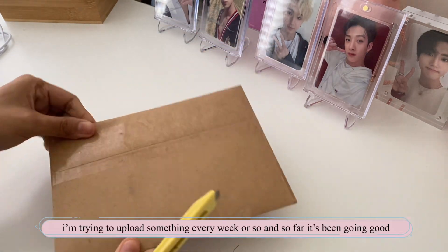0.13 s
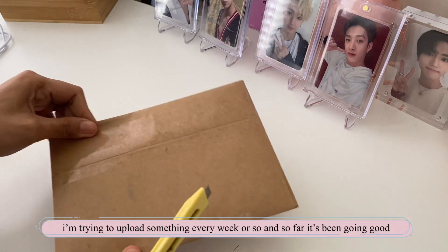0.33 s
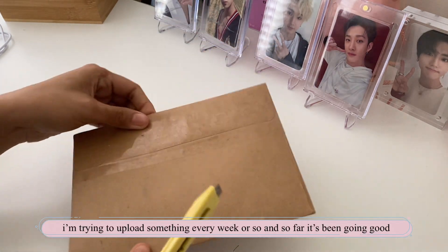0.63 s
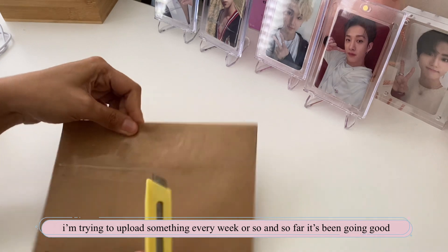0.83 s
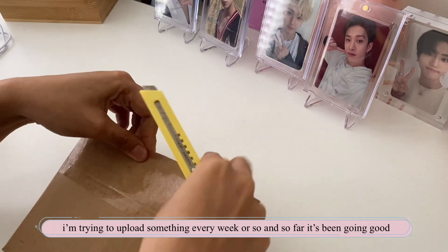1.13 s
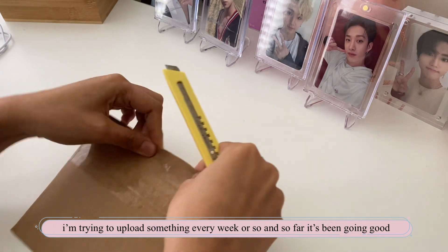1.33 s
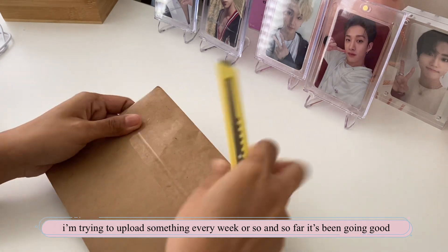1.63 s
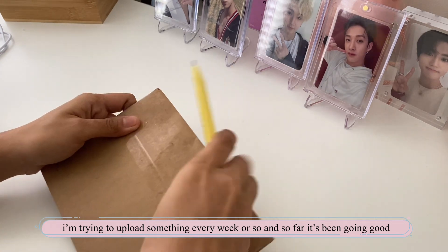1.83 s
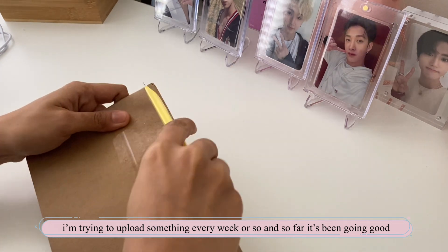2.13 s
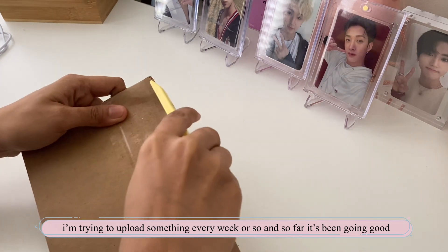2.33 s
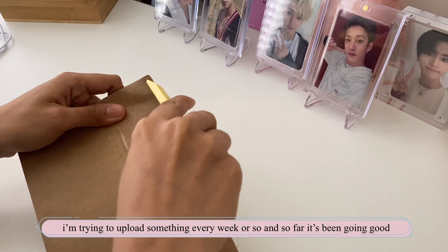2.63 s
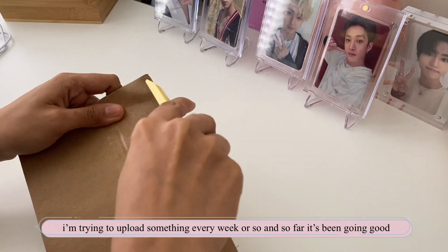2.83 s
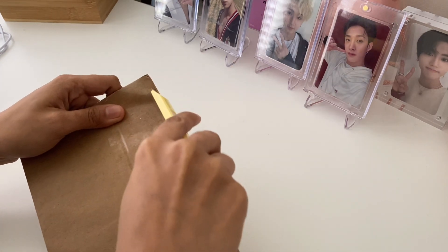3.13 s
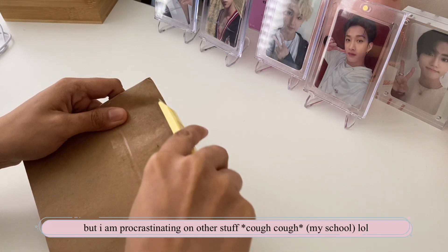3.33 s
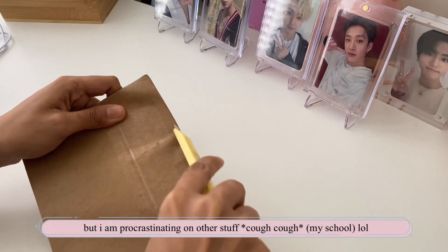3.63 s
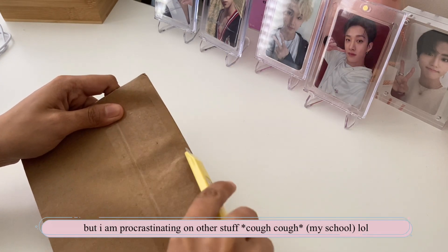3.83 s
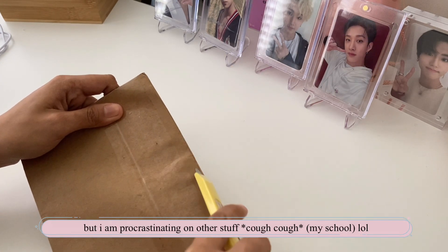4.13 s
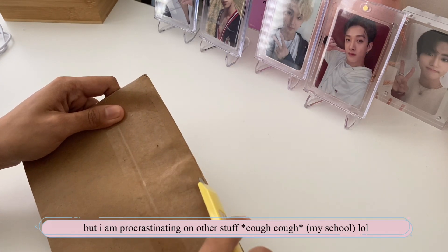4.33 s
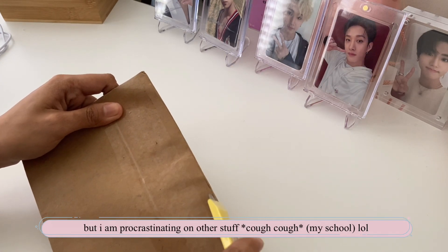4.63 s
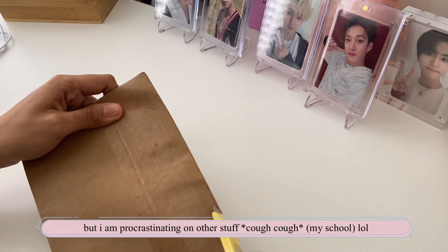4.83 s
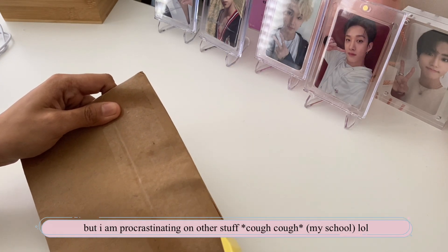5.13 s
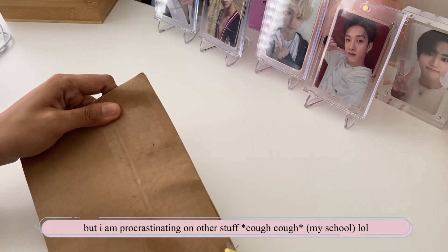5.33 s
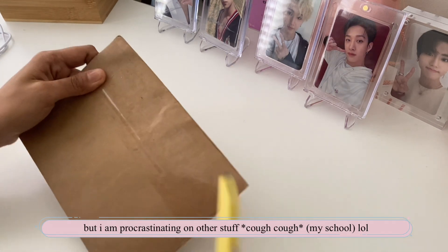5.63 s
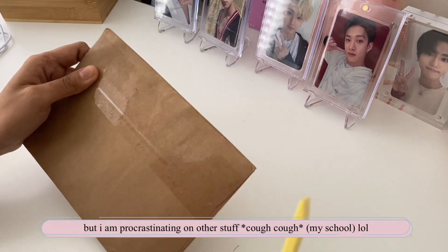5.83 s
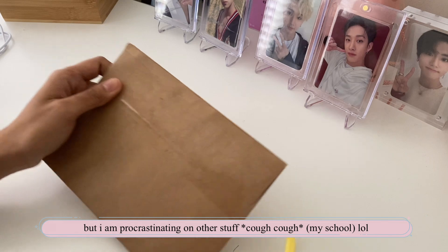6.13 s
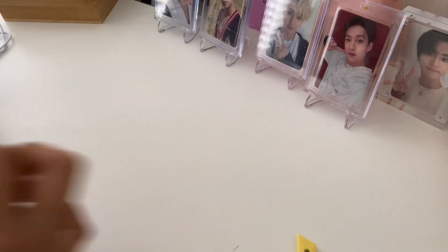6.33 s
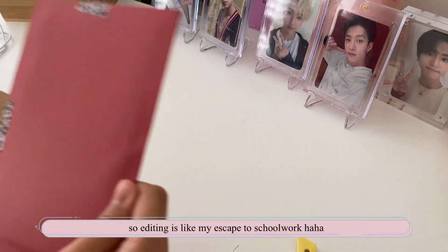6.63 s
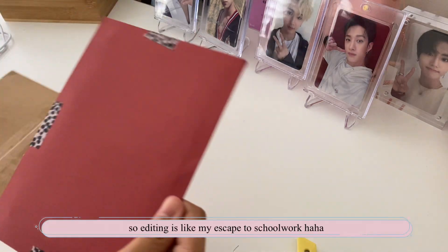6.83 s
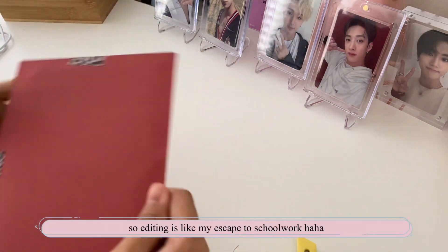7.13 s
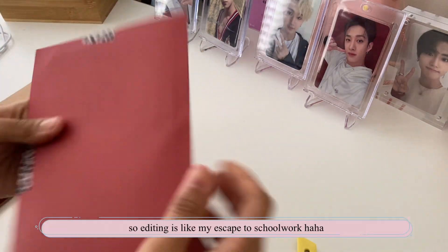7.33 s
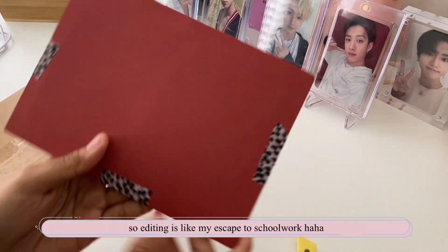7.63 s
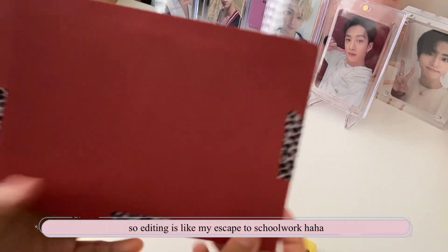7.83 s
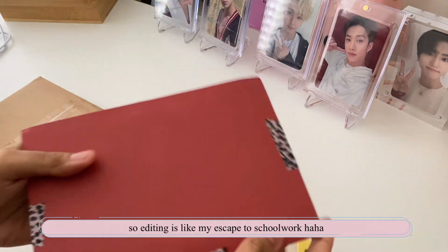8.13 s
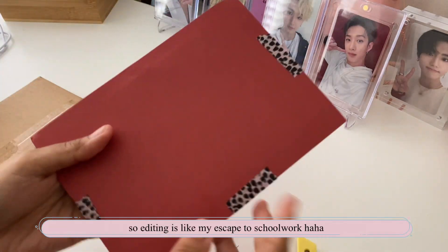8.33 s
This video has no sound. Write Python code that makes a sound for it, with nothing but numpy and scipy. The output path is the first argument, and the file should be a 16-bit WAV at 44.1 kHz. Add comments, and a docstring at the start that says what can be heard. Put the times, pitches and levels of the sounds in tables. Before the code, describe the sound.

Close stereo microphone at a desk in a small room, leaning left. A paper mailer is softly shuffled and knocks once on the desktop. A utility knife then tears the fold in short, scratchy pushes full of crisp snaps. The slider ticks rapidly as the blade retracts, a stiff card whisks out in one quick scrape, and light papery handling follows over low rumble and a faint distant motor.

```python
"""A utility knife slits a paper mailer in short pushes: dense random fibre snaps, filtered by paper resonances.
Before that the mailer is turned over and bumped on a desk: soft slides of noise grains, knocks and desk modes.
Afterwards the slider ticks, a card is whisked out in one quick scrape, and it is turned in the hands.
A small room answers with filtered noise; beneath lie a low rumble, a faint hiss and a distant motor's drone.
A close stereo microphone hears it, leaning left through most of its range."""
import sys
import numpy as np
from scipy import signal
from scipy.fft import rfft, irfft, next_fast_len
from scipy.io import wavfile
from scipy.ndimage import uniform_filter1d

SR = 44100
rng = np.random.default_rng(int(sys.argv[2]) if len(sys.argv) > 2 else 0)


def master_out(mix):
    """Clip the mix to full scale and print it as 16-bit PCM to the path in sys.argv[1]."""
    frames = np.transpose(np.atleast_2d(mix))
    ceiling = np.clip(frames, -1, 1)
    pcm = np.round(ceiling * 32767).astype(np.int16)
    wavfile.write(sys.argv[1], SR, pcm)


N = 373659
TIME = np.arange(N) / SR  # seconds


def amp(db):
    """Decibels to gain."""
    return 10 ** (np.asarray(db) / 20)


def evened(x):
    """Scales to rms 1."""
    return x / np.sqrt(np.mean(x ** 2) + 1e-20)


def read(points, hz):
    """Reads a table on a log-frequency axis."""
    f, value = np.transpose(points)
    return np.interp(np.log(hz + 1), np.log(f + 1), value)


def follow(points):
    """Reads a table of (seconds, value) along the whole scene."""
    return np.interp(TIME, *np.transpose(points))


def add(mix, s, sound):
    """Mixes a sound in at time s."""
    part = mix[..., max(round(s * SR), 0):][..., :sound.shape[-1]]
    part += sound[..., :part.shape[-1]]


def band(x, edges_hz, kind, order=2):
    """Causal low-, high- or band-pass."""
    edges_hz = np.clip(edges_hz, 10, .49 * SR)
    return signal.sosfilt(signal.butter(order, edges_hz, kind, fs=SR, output="sos"), x)


def colour(x, points, size=8192):
    """Causal, minimum-phase filter with the given spectrum."""
    log_gain = np.log(amp(read(points, abs(np.fft.fftfreq(size, 1 / SR)))))
    response = np.exp(np.conj(signal.hilbert(log_gain)))
    impulse = np.fft.ifft(response).real[:size // 2]
    return signal.oaconvolve(x, impulse)[:len(x)]


def resonate(x, hz, width_hz):
    """One resonance of gain 1 at its peak."""
    return signal.lfilter(*signal.iirpeak(min(hz, .45 * SR), hz / min(width_hz, .3 * SR), SR), x)


def ring(x, modes):
    """A sound together with the resonances that it excites."""
    return x + sum(amp(db) * resonate(x, hz, width) for hz, width, db in modes)


def glide(x, pitches, width_hz):
    """A resonance that follows a pitch curve: shift the pitch down to zero, low-pass, shift back."""
    turn = np.exp(2j * np.pi * np.cumsum(follow(pitches)) / SR)
    r = np.exp(-np.pi * width_hz / SR)
    return 2 * (turn * signal.lfilter([1 - r], [1, -r], x / turn)).real


def burst(db, modes, decay_s, tail, apart):
    """A sudden crackle of a few milliseconds into a set of resonances, left and right."""
    t = np.arange(SR // 20) / SR
    shared, own = rng.standard_normal((2, len(t)))
    onset = 1 - np.exp(-t / .001)
    shape = onset * (np.exp(-t / decay_s) + tail * np.exp(-t / .007))
    pair = ring(shape * (shared + np.array([[1], [-1]]) * apart * own), modes)
    return amp(db) * pair / np.linalg.norm(pair[0])  # db sets the energy of the left side


def fibres(per_s, spread_db, tugs_per_s, tug_size, tug_s):
    """Tiny fractures of random size; they surge each time the paper catches and lets go, then die away."""
    kicks = (rng.random(N) < tugs_per_s / SR) * rng.uniform(0, 1.29, N)
    t = np.arange(SR // 10) / SR
    tug = t / tug_s * np.exp(1 - t / tug_s)
    surge = 1 + tug_size * signal.oaconvolve(kicks, tug)[:N]
    surge /= uniform_filter1d(surge, SR // 20)  # the hand keeps the mean force steady
    sizes = amp(spread_db * np.minimum(rng.exponential(1, N), 4)) * surge
    snapped = rng.random(N) < per_s / SR
    return evened(sizes * rng.choice([-1, 1], N) * snapped)


def stroke(start_s, length_s, rise_s, release_s):
    """Pressure builds over the rise (at once if it is negative) and dies away after the stroke's length."""
    t = TIME - start_s
    build = np.clip(t / max(rise_s, 1 / SR), 0, 1)
    return build * np.exp(-np.clip((t - length_s) / release_s, 0, 20))


def friction(strokes, releases_s, grains):
    """Grains sorted by pitch into flutter, rasp and fizz; the strokes set the force of each."""
    flutter = evened(band(grains, 870, "low", order=3))
    rasp = evened(band(grains, [1300, 8800], "band", order=3))
    fizz = evened(band(grains, [8800, 18000], "band", order=3))
    start, length, rise, force_db, flutter_db, fizz_db = np.transpose(strokes)
    pressure = np.array([stroke(*timing) for timing in zip(start, length, rise, releases_s)])
    gains = amp([force_db, force_db + flutter_db, force_db + fizz_db])
    mid, low, high = np.sqrt(gains ** 2 @ pressure ** 2)  # overlapping strokes add as power
    return mid * rasp + low * flutter + high * fizz


def flex(x, depth_db, size=512):
    """The bending sheet radiates in shallow, shifting lobes, a little differently to each side."""
    z = signal.stft(x, SR, nperseg=size, noverlap=size * 3 // 4)[2]
    lobes = rng.standard_normal((3,) + z.shape)
    for _ in range(2):  # smooth over pitch, then over time
        lobes = uniform_filter1d(uniform_filter1d(lobes, size=3, axis=1), size=40, axis=2)
    shared, lean, lag = evened(lobes)
    side = np.array([1, -1])[:, None, None]
    z = z * amp(depth_db * (shared + .7 * side * lean)) * np.exp(.5j * side * lag)
    y = signal.istft(z, SR, nperseg=size, noverlap=size * 3 // 4)[1][:, :N]
    return evened(y) * np.std(x)


def background():
    """Low rumble of room and desk, nearly alike on both sides, with a motor's wavering drone and faint hiss."""
    # Rumble level. Each row: time in seconds, level in dB.
    rumble_level = [(0, -60.5), (1.6, -63.5), (2.7, -65), (3.9, -60.5), (4.25, -70.5), (4.7, -71),
                    (5.2, -55), (6.15, -64), (6.6, -55), (7.6, -56), (8.0, -50.5), (8.47, -53)]
    # Rumble spectrum. Each row: frequency in Hz, gain in dB.
    rumble_colour = [(15, -17.5), (35, -3.5), (48, 2.5), (61, 1.5), (72, 3.5), (100, -5), (120, -2.5),
                     (155, -8), (205, -4.5), (260, -18.5), (400, -22), (700, -54.5), (1500, -50.5),
                     (4000, -76.5)]
    # Pitch of a faint motor beyond the room that idles, then revs twice. Each row: time in seconds, pitch in Hz.
    drone_pitch = [(7.22, 186), (7.3, 216), (7.55, 196), (7.8, 193), (8.2, 209)]
    # Hiss spectrum. Each row: frequency in Hz, gain in dB.
    hiss_colour = [(30, -4), (300, 1.5), (600, -2.5), (1200, -13.5), (3000, -16), (8000, -16.5),
                   (16000, -20)]
    drone_start_s, drone_rise_s, drone_db, hiss_db = 6.25, 0.55, -60, -79

    shared, apart = (evened(colour(rng.standard_normal(N), rumble_colour)) for _ in range(2))
    rumble = amp(follow(rumble_level)) * (shared + np.array([[.13], [-.13]]) * apart)

    waver = 1 + 0.63 * evened(band(rng.standard_normal(N), 9.1, "low"))
    swell = amp(drone_db) * np.clip((TIME - drone_start_s) / drone_rise_s, 0, 1)
    drone = swell * waver * np.sin(2 * np.pi * np.cumsum(follow(drone_pitch)) / SR)

    both, left, right = (evened(colour(rng.standard_normal(N), hiss_colour)) for _ in range(3))
    hiss = amp(hiss_db) * evened(both + np.array([left, right]))
    return rumble + drone + hiss


def room(x, size=256):
    """Diffuse reflections from the walls: noise that fades in softly and dies at its own rate in each band."""
    # Reverberation. Each row: frequency in Hz, time to fall by 60 dB in seconds.
    room_t60 = [(100, 0.87), (500, 0.24), (2000, 0.57), (6000, 0.12), (16000, 0.16)]
    hz, t, z = signal.stft(rng.standard_normal((2, SR // 2)), SR, nperseg=size)
    decay = amp(-60 * t / read(room_t60, hz)[:, None])
    tail = signal.istft(z * decay, SR, nperseg=size)[1]
    tail *= np.clip(np.arange(tail.shape[1]) / SR / 0.0088, 0, 1) ** 2
    return signal.fftconvolve(x, tail / np.linalg.norm(tail[0]), axes=1)[:, :N]


def desk():
    """The desk top booms under the heavier blows: a sum of decaying sine modes."""
    # Blows that reach the desk top. Each row: time in seconds, relative level in dB.
    thumps = [(.787, -22.5), (0.805, -27), (1.6, -45), (6.268, -37), (6.371, -44), (6.631, -44),
              (7.924, -41.5), (8.166, -40.5)]
    # Modes of the desk top. Each row: pitch in Hz, relative level in dB, time to fall by 60 dB in seconds.
    desk_modes = [(62.1, -5, 0.2), (88, -3, 0.2), (122, -9.5, .42), (185.1, -11, 0.4), (267.6, -9, 0.1),
                  (340, -6.5, 0.11), (547, -14, 0.051)]
    out, t = np.zeros(N), np.arange(SR) / SR
    boom = sum(amp(level - 60 * t / t60) * np.sin(2 * np.pi * hz * t) for hz, level, t60 in desk_modes)
    for s, db in thumps:
        add(out, s, amp(db - 6.5) * boom)
    return band(out, 51, "high")


def taps():
    """A stiff edge is struck: a heavily damped knock and a short papery rattle."""
    # Taps of card, knife and fingers. Each row: time in seconds, relative level in dB,
    # pitch of the struck spot in Hz.
    tap_list = [(0.199, -30.5, 1530), (0.201, -26.5, 2480), (0.296, -50, 1262), (0.784, -12, 840),
                (0.793, -20.5, 401), (0.801, -18.5, 1010), (0.812, -27, 813), (0.82, -25.5, 401),
                (1.16, -32.5, 900), (1.598, -34.5, 1050), (1.626, -34, 789), (1.68, -42, 2497),
                (2.357, -47, 810), (3.937, -21.5, 2000), (4.082, -19, 3380), (6.067, -41, 407),
                (6.367, -25, 680), (6.631, -37, 3660), (6.907, -34.5, 2450), (7.656, -43, 910),
                (7.795, -35, 1880), (8.061, -40.5, 1034), (8.093, -44.5, 813), (8.167, -36, 800)]
    out, t = np.zeros((2, N)), np.arange(SR // 10) / SR
    rattle_decay = 0.063 * np.exp(-t / 0.0045) + 0.027 * np.exp(-t / .012)
    for s, db, hz in tap_list:
        rattle = rng.standard_normal((2, len(t))) * rattle_decay
        strike = band(signal.unit_impulse(len(t)) + rattle, 3 * hz, "low")
        knock = resonate(strike, hz, 0.48 * hz)
        add(out, s + .001, amp(db - 3.5) * (knock / abs(knock).max() + 0.94 * rattle))
    return out


def handling():
    """Paper slides softly over desk and skin; a firmer slide is brighter."""
    # Slides on the desk and under fingers. Each row: start in seconds, length in seconds, rise in seconds,
    # relative force in dB, flutter of the sheet in dB re force.
    slides = [(0, 0.14, 0.0054, -70, 7), (.2, .11, 0.011, -76, 10.5), (0.366, 0.47, 0.024, -65.5, -2.5),
              (.449, 0.073, 0.0059, -56, -13), (0.717, 0.22, 0.077, -50, -6.5),
              (.98, 0.44, 0.017, -67.5, 2.5), (1.249, .18, .14, -54, -9), (1.477, 0.21, 0.084, -59.5, -1.5),
              (1.699, 0.32, .03, -68.5, -21), (5.481, 0.27, 0.012, -60, 1.5), (5.758, .48, .02, -74.5, 4.5),
              (6.34, .07, 0.034, -56, 3), (6.493, .06, 0.006, -63.5, 3.5), (6.574, .08, .03, -56, -1.5),
              (6.658, 0.2, 0.033, -62.5, -12.5), (6.899, 0.025, 0.0065, -61, 3),
              (7.186, .14, .012, -64, -8), (7.414, 0.059, .05, -75, -4), (7.582, 0.12, 0.14, -62, 0),
              (7.731, 0.052, 0.06, -48, -4.5), (7.92, .02, .004, -60, -10.5), (8.028, 0.12, 0.04, -60, -5),
              (8.366, 0.03, 0.011, -64, -1.5)]
    # Resonances of the sheet. Each row: pitch in Hz, width in Hz, level in dB.
    sheet = [(2180, 290, -20), (3750, 2200, -7), (7100, 1200, -11.5)]
    # The swish peaks at a pitch that shifts with the grip. Each row: time in seconds, pitch in Hz.
    gap = [(.45, 2300), (.9, 2350), (1.35, 1800), (1.8, 3120), (2.15, 2665), (6.5, 2460), (6.8, 3550),
           (7.45, 3300), (7.7, 2600), (7.85, 3600), (8.4, 4100)]
    # Spectrum of the slides. Each row: frequency in Hz, gain in dB.
    slide_colour = [(60, -16), (250, -1), (500, -1.5), (1000, -0.5), (1500, 0), (3000, 3.5), (5500, 4.5),
                    (8000, 6.5), (12000, 9), (16000, 6)]
    release_s = 0.037
    fizz_db, fizz_per_db = -7, 0.12  # fizz re force at a force of -60 dB, and its gain for each dB of force

    strokes = [(*row, fizz_db + fizz_per_db * (row[3] + 60)) for row in slides]
    grains = fibres(per_s=9000, spread_db=2.8, tugs_per_s=50, tug_size=.8, tug_s=.0015)
    grains = ring(grains, sheet) + amp(6) * glide(grains, gap, width_hz=1000)
    slide = colour(friction(strokes, [release_s] * len(strokes), grains), slide_colour)
    return amp(-3.5) * flex(slide, depth_db=1.3)


def slider():
    """Small plastic ticks over near-even notches, harder as it goes, as the blade is drawn back in."""
    # Resonances of the slider. Each row: pitch in Hz, width in Hz, level in dB.
    slider_modes = [(2180, 680, 5), (4020, 500, -5), (6300, 920, 4.5)]
    start_s, end_s, notch_count = 5.602, 5.736, 12
    first_db, last_db, spread_db = -33, -21, 1
    out = np.zeros((2, N))
    times = np.linspace(start_s, end_s, notch_count)
    levels = np.linspace(first_db, last_db, notch_count)
    for s, db, (late, harder) in zip(times, levels, rng.standard_normal((notch_count, 2))):
        tick = burst(db + spread_db * harder, slider_modes, decay_s=.0012, tail=.03, apart=.4)
        add(out, s + .001 * late, tick)
    return out


def whisk():
    """The card scrapes quickly out past the cut edge: one stroke of very dense grains."""
    # The stroke: start in seconds, length in seconds, rise in seconds (negative: at once),
    # relative force in dB, flutter in dB re force, fine fizz in dB re force.
    pull = (6.259, .053, -0.0954, -36, -8, 2.5)
    # Resonances of the card. Each row: pitch in Hz, width in Hz, level in dB.
    card = [(695, 130, -32.5), (4350, 190, 1), (4980, 250, 2), (6500, 300, 1), (7250, 590, -2)]
    # Spectrum of the scrape. Each row: frequency in Hz, gain in dB.
    scrape_colour = [(60, -16.5), (250, 4.5), (700, -3), (1300, -7), (3000, 4), (16000, -1)]
    release_s = .33 * pull[1]  # a share of its length
    grains = fibres(per_s=21000, spread_db=4.0, tugs_per_s=140, tug_size=0.84, tug_s=0.0017)
    scrape = colour(friction([pull], [release_s], ring(grains, card)), scrape_colour)
    return flex(scrape, depth_db=1.8)


def snaps():
    """Crisp snaps of paper and tape: a bundle of fibres gives way and jolts the blade into ringing."""
    # The snaps. Each row: time in seconds, relative level in dB, treble in dB.
    snap_list = [(0.2011, -32, -9), (0.7711, -16.5, -0.5), (1.6, -38, -10.5), (1.629, -39, -8),
                 (1.921, -43.5, 3.5), (2.356, -46.5, -5), (2.7673, -35.5, 6), (2.7947, -40.5, 1),
                 (2.8355, -43.5, 2.5), (2.889, -33, 3.5), (2.9183, -40, 2.5), (3.0931, -19, 2.5),
                 (3.1211, -27.5, -4), (3.2325, -32.5, -8.5), (3.255, -31, 8.5), (3.6395, -33.5, 7.5),
                 (3.9391, -14.5, -17), (4.2357, -32.5, 8.5), (4.532, -30.5, -6.5), (4.573, -17, -1),
                 (4.726, -34, 4.5), (4.799, -27, -11), (4.9059, -20.5, 1), (4.9467, -26, 4),
                 (5.0487, -23, 6.5), (5.0841, -23.5, 5), (5.1743, -25, 2.5), (5.3176, -20.5, -3),
                 (5.4326, -28.5, 3), (5.469, -18.5, 1.5), (5.736, -33, -3), (6.368, -35, -12),
                 (7.2674, -33, 8), (7.5434, -44.5, -11), (7.9237, -36, 5), (8.105, -36, 0),
                 (8.1659, -32.5, 2.5), (8.4466, -42, -3)]
    # Resonances of the blade. Each row: pitch in Hz, width in Hz, level in dB.
    blade = [(1762, 240, -7.5), (2600, 130, -9), (4000, 320, -5.5), (5020, 190, 2), (7100, 610, 7.5),
             (7800, 930, 1.5)]
    # Spectrum of the snaps. Each row: frequency in Hz, gain in dB.
    snap_colour = [(100, -34.5), (500, -4), (1500, 3.5), (4000, 3.5), (7000, -6), (10000, -1), (16000, -6)]
    out = np.zeros((2, N))
    for s, db, treble_db in snap_list:
        crack = burst(db + 11.5, blade, decay_s=0.00031, tail=0.15, apart=0.56)
        body = band(crack, 5600, "low", order=3)
        treble = band(crack, 6500, "high", order=3)
        add(out, s + .0005, body + amp(treble_db) * treble)
    return np.array([colour(side, snap_colour) for side in out])


def knife():
    """The blade tears through the fold fibre by fibre, push after push, over a quiet drag in the slit."""
    # Pushes of the blade. Each row: start in seconds, length in seconds, rise in seconds,
    # relative force in dB, flutter of the sheet in dB re force, fine fizz in dB re force.
    pushes = [(2.935, 0.097, 0.015, -47.5, -14, -7.5), (3.064, 0.074, 0.017, -42, -14.5, -2),
              (3.149, 0.042, .005, -54, -11, -4), (3.246, 0.18, 0.032, -43.5, -9.5, -4),
              (3.428, 0.12, 0.029, -44, -4.5, 0), (3.651, 0.16, 0.043, -41.5, -9.5, -1),
              (3.935, 0.042, 0.0053, -44.5, -13, -2.5), (3.982, 0.055, 0.028, -40, -16, 3),
              (4.037, 0.11, 0.011, -47.5, -13.5, -5), (4.27, 0.054, 0.0054, -51, -22.5, -7),
              (4.307, 0.12, 0.046, -42, -21.5, -6.5), (4.533, 0.05, 0.025, -38.5, -13.5, -5.5),
              (4.588, 0.061, .015, -41.5, -15, -8), (4.737, 0.12, 0.083, -38.5, -16, -5.5),
              (4.879, 0.032, 0.032, -44.5, -16, -5), (4.94, .022, 0.0035, -45, -13, -6),
              (4.994, 0.096, 0.019, -38.5, -11.5, -5), (5.157, 0.074, 0.011, -47, -13, -5),
              (5.242, 0.095, 0.033, -44, -13, -1), (5.374, 0.032, .008, -48, -12.5, -0.5),
              (5.418, 0.054, 0.037, -39.5, -17.5, -4.5)]
    # The blade drags steadily in the slit beneath the pushes: one row, same columns (negative rise: at once).
    drag = (3, 2.5, -2.3, -62, -8.5, -4.5)
    # Resonances of the mailer. Each row: pitch in Hz, width in Hz, level in dB.
    mailer = [(750, 940, -3), (4240, 220, -6.5), (5000, 130, -13), (7160, 670, -4)]
    # The slit flap mostly rings higher as its uncut part shortens. Each row: time in seconds, pitch in Hz.
    flap = [(2.95, 1764), (3.7, 1990), (4.3, 2015), (4.8, 3120), (5.35, 2920), (5.47, 3560)]
    # Spectrum of the cut. Each row: frequency in Hz, gain in dB.
    cut_colour = [(60, -39), (150, -2.5), (300, 0.5), (700, -1.5), (1400, 0), (2500, -3), (5500, 2.5),
                  (8000, 4), (9500, 5), (12000, 4), (16000, 3)]

    grains = fibres(per_s=5000, spread_db=3.4, tugs_per_s=140, tug_size=.9, tug_s=.0014)
    grains = ring(grains, mailer) + amp(3.0) * glide(grains, flap, width_hz=310)
    releases_s = [0.25 * push[1] for push in pushes]  # a share of each push's length
    releases_s.append(releases_s[-1])  # the drag lets go like the last push
    cut = colour(friction([*pushes, drag], releases_s, grains), cut_colour)
    return flex(cut, depth_db=2.3)


def hollow(x):
    """The first bites sound hollow: a close reflection combs the treble and is lost as the slit opens."""
    delay_s, full_share, above_hz = .001, .65, 2500
    end_s, fade_s = 3.3, .25
    echo = np.array([np.interp(TIME - delay_s, TIME, side, left=0) for side in x])
    echo = band(echo, above_hz, "high", order=1)
    share = full_share * np.clip((end_s - TIME) / fade_s, 0, 1)
    return (x + share * echo) / np.sqrt(1 + share ** 2)


def scene():
    """Everything on the desk, with the room answering."""
    paper = hollow(knife() + snaps()) + whisk() + handling() + slider()
    knocks = taps() + desk()
    echo = room(amp(-13) * paper + amp(-12) * knocks)
    return paper + knocks + echo + background()


def record(dry):
    """The stereo pair mostly leans left; its treble is one signal spread by phase; then the band limit."""
    # Left minus right. Each row: frequency in Hz, level difference in dB.
    balance = [(60, 3), (130, -1.5), (280, 6.5), (1000, 4), (2200, 4.5), (4000, 5), (5800, 4), (6600, 2.5),
               (16000, 0)]
    # Lead of the right channel in the treble. Each row: frequency in Hz, phase in turns.
    lead = [(7350, 0), (8850, .5), (9350, .5), (10950, 1), (11600, 1), (13000, 1.5), (13650, 1.5),
            (15000, 2)]
    edge_hz = 15900
    size = next_fast_len(N + 4096)
    hz, (left, right) = np.fft.rfftfreq(size, 1 / SR), rfft(dry, size)
    twist = 2 * np.pi * np.interp(hz, *np.transpose(lead))
    # above 6300 Hz the sides differ only where the twist is away from a half turn
    width = np.where(hz < 6300, 1, abs(np.sin(twist)))
    mid, side = (left + right) / 2, width * (left - right) / 2
    lean = amp(read(balance, hz) / 2)
    pair = np.array([(mid + side) * lean, (mid - side) / lean * np.exp(1j * twist)])
    pair = irfft(pair, size)[:, :N]
    low_pass = signal.firwin(401, edge_hz, window=("kaiser", 8), fs=SR)
    return signal.oaconvolve(pair, low_pass[None], "same")


dry = scene()
out = record(dry)
master_out(out)
```